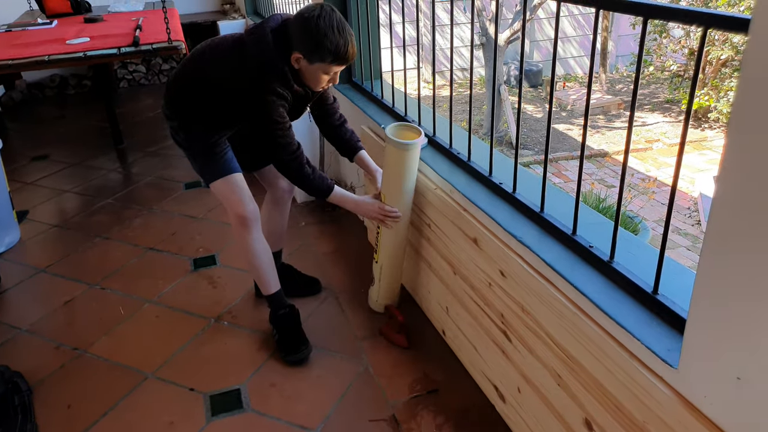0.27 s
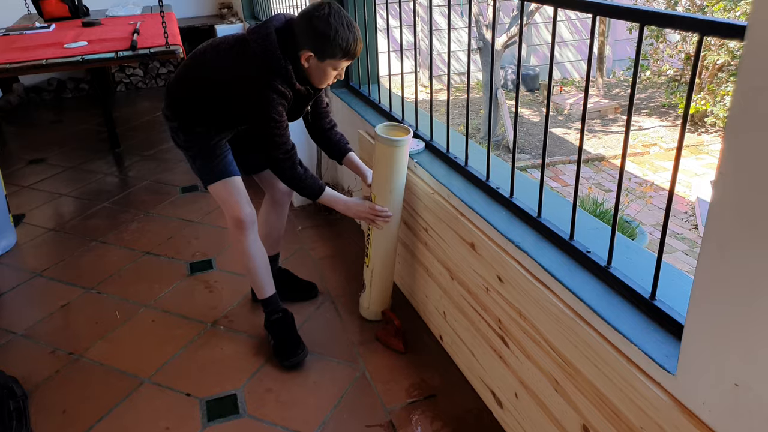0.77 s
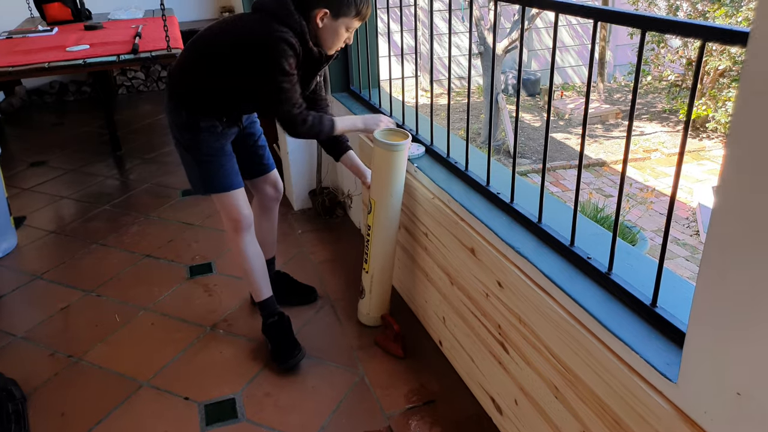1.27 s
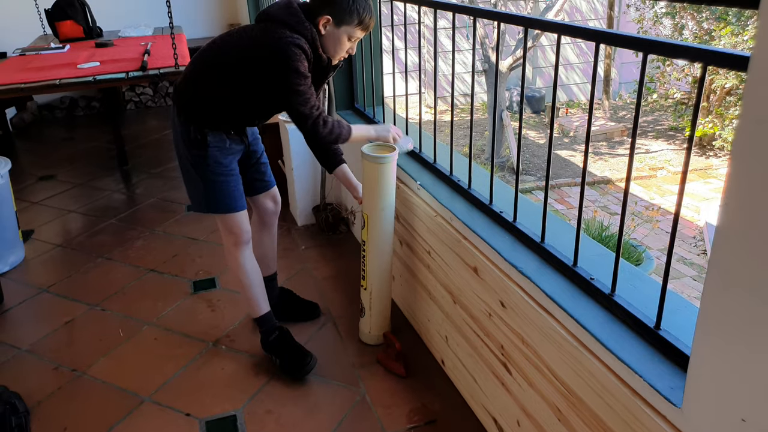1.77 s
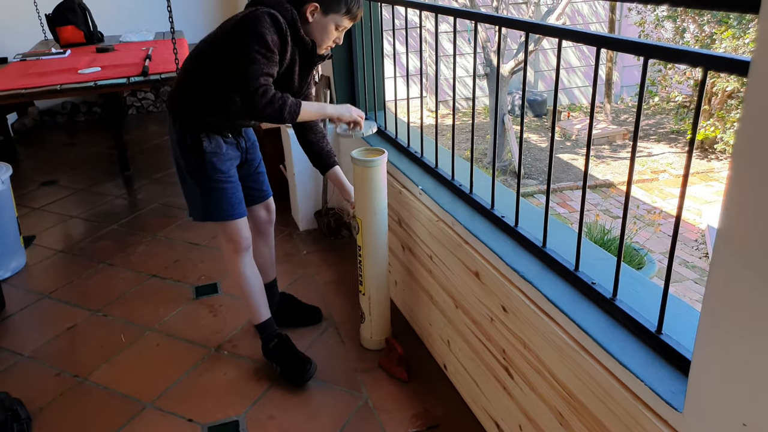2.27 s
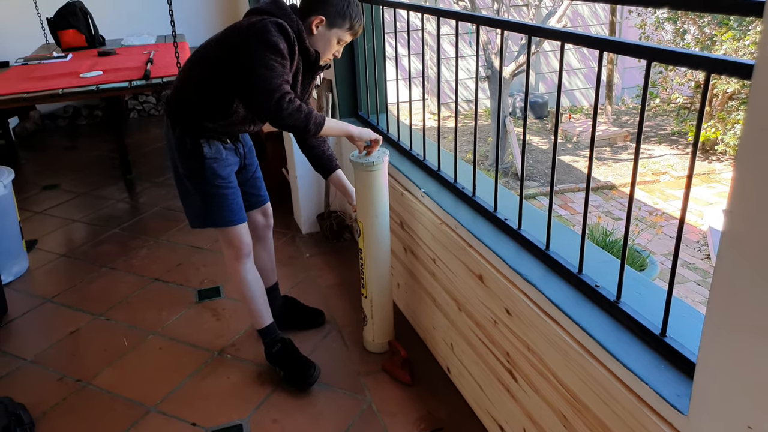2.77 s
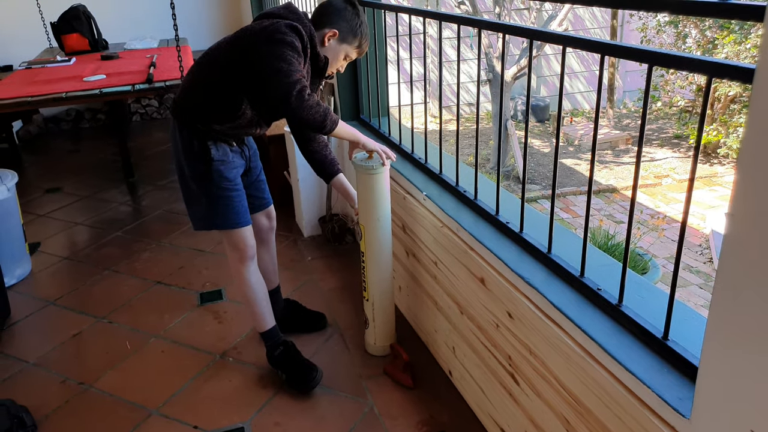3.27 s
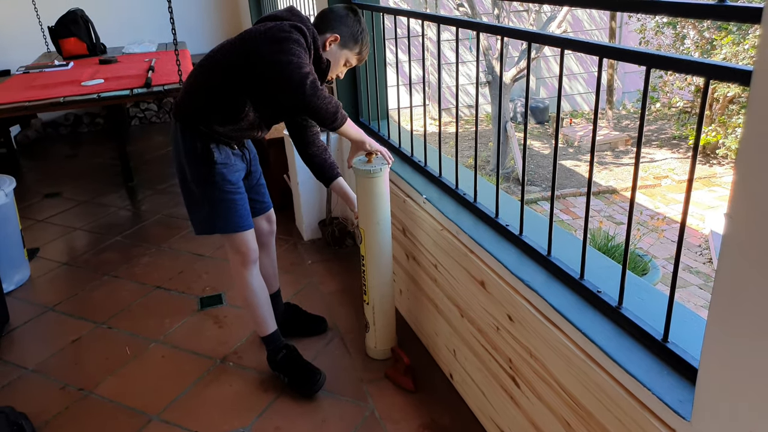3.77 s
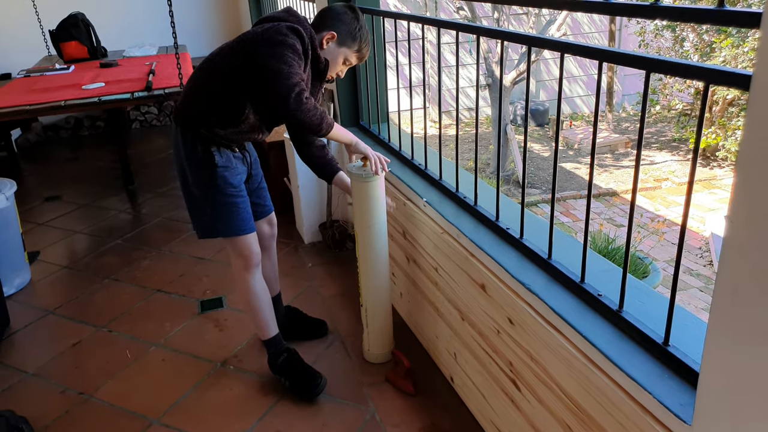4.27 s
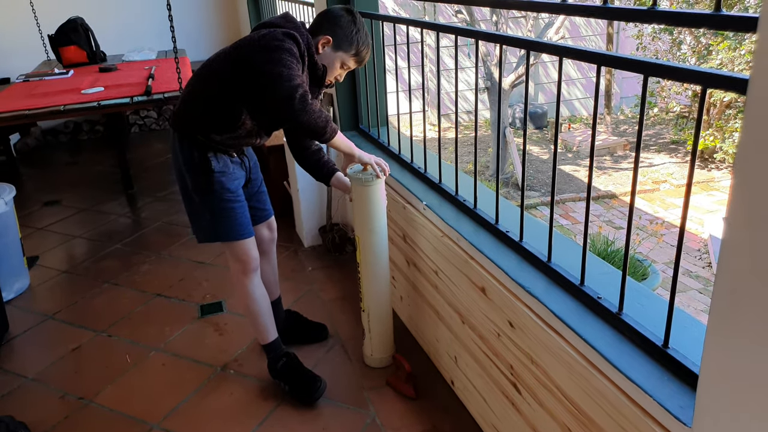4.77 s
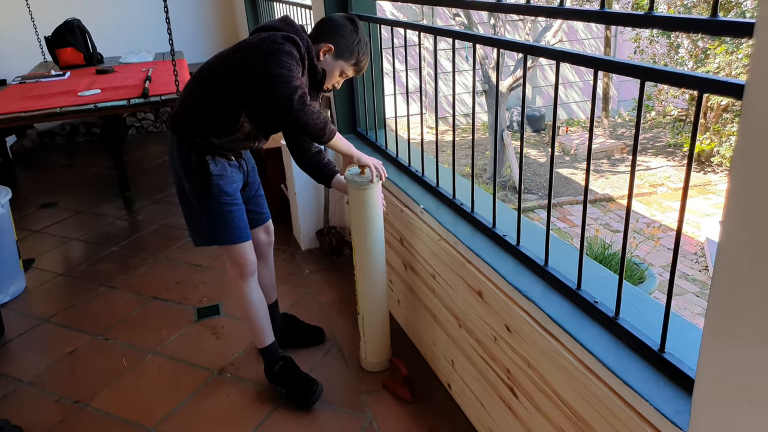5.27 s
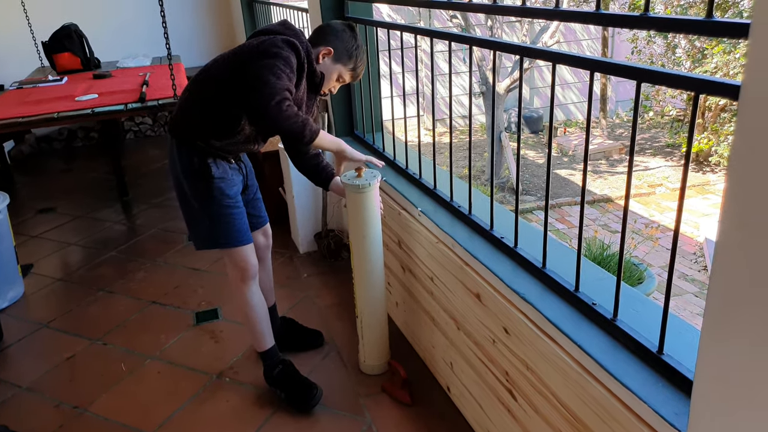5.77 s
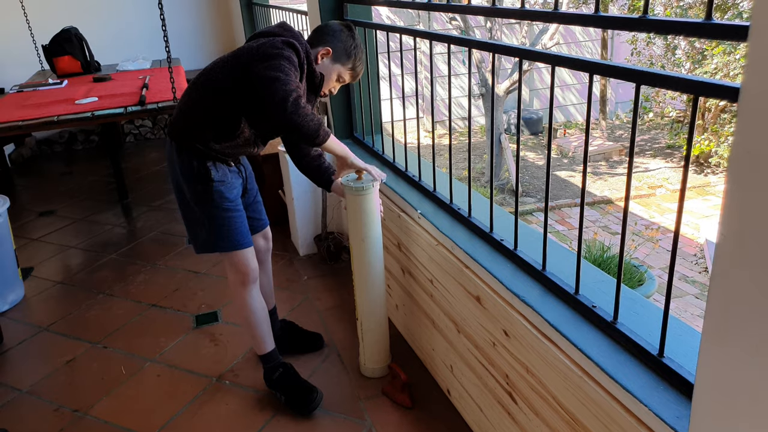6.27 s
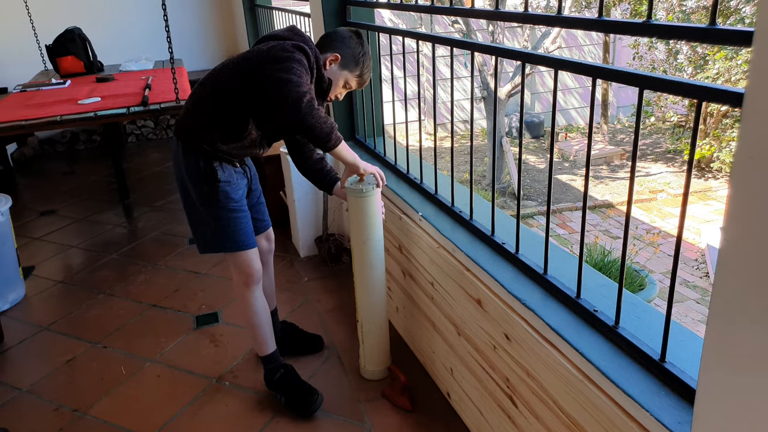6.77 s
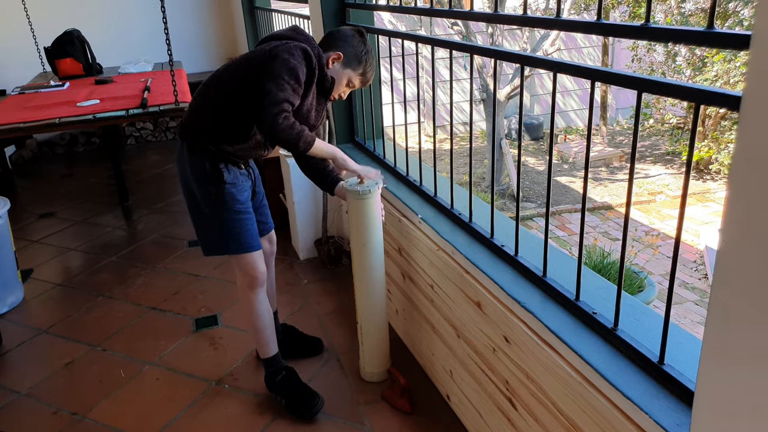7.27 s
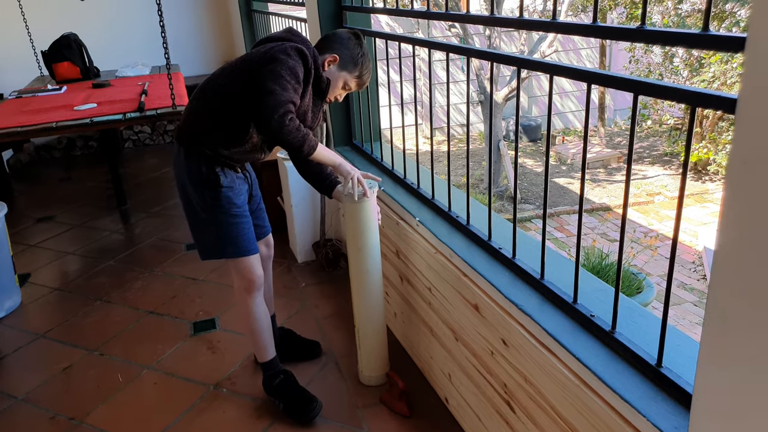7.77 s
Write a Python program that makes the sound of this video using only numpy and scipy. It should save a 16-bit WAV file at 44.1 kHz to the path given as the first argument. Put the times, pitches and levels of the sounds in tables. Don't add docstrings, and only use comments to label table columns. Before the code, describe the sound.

A wide plastic pipe strikes floor tiles three times in quick succession, loud, hollow and resonant. Then much quieter handling follows: a cap rubs and turns on the rim with grainy scrapes, dry ticks, dull presses and scattered light knocks, growing busier after the middle. Small birds chirp faintly outdoors over a soft hush. Close stereo microphones on an open veranda with a short reverberation.

```python
import sys
import numpy as np
from scipy import signal
from scipy.fft import rfft, irfft, next_fast_len
from scipy.io import wavfile
from scipy.ndimage import uniform_filter1d

SR = 44100
rng = np.random.default_rng(int(sys.argv[2]) if len(sys.argv) > 2 else 0)


def store_pcm(level_fs):
    pcm = np.round(np.clip(level_fs, -1, 1) * 32767).astype(np.int16)
    wavfile.write(sys.argv[1], SR, np.atleast_2d(pcm).T)


def undo_db(level):
    steps = np.asarray(level, float) / 20
    return 10 ** steps


N = 353329

# (time [s], peak [dB], brightness [dB/octave], wall ring [Hz], wall ring [dB])
KNOCKS = [
    (-.085, -14.5, -1.5, 1170, -15),
    (0.2384, -3, 2.5, 1070, -16),
    (.461, -4.5, 1, 980, -15),
    (0.664, -4, 1.5, 1295, -8.5),
]
# (frequency [Hz], level [dB], t60 [s], sign [+1 or -1])
AIR_MODES = [(152, -7, .8, -1), (163.5, -7, .2, -1), (280, 3, .17, 1), (301.5, 3, .17, -1),
             (109, -9, .2, 1), (450, -17, .09, -1), (515, -3, .05, 1), (556, 0.1, .07, 1),
             (595, -4, .06, 1), (660, -10, .06, 1), (720, -10, .07, 1)]
# (frequency [Hz], level [dB], t60 [s])
WALL_MODES = [(987, -9.5, .05), (1132, -8.5, 0.032), (1340, -15.5, 0.03), (1616, -13.5, 0.035),
              (1756, -16, .03), (2053, -11.5, 0.063), (2200, -19.5, 0.045), (3240, -19, .02),
              (3400, -13, 0.008), (4050, -22.5, 0.015)]
# (frequency [Hz], gain [dB])
RIM_CRACK = [(300, -14), (1200, 17.5), (4000, -12.0), (7000, -34.0), (16000, -46.0)]
# (frequency [Hz], gain [dB])
RIM_CLICK = [(400, -10.5), (1500, -5), (3400, 1.3), (6000, -11.5), (16000, -35.5)]

# (frequency [Hz], t60 [s], level [dB])
VERANDA = [(59.3, 0.4, -11.5), (125, 0.34, -23.5), (252, 0.28, -13.5), (1000, 0.23, -8.5),
           (3000, 0.31, -9.5), (7600, 0.18, -7), (15700, 0.067, -29)]
# (frequency [Hz], density [dB per Hz])
HUSH = [(25, -1), (75, 2), (130, -7), (300, -3), (600, -6), (1100, -8), (1600, -11.5), (2500, -22.5),
        (3500, -11.5), (6000, -9.5), (7300, -12), (8200, -33), (12500, -28), (16000, -44)]

# (start [s], length [s], level [dB], grit above the hollow rub [dB])
TURNS = [(0.0, 0.021, -56, 1), (0.09, 0.53, -56.5, -3), (0.703, 0.44, -65.5, -1.5), (1.409, 0.18, -70, 2.5),
         (1.762, 0.021, -56, 3), (1.948, 0.38, -61, 1.3), (2.412, 0.035, -57.5, -4.5),
         (2.578, 0.23, -64, 2.5), (2.9, 0.077, -67, -3), (3.104, 0.12, -71.5, 6), (3.264, .02, -62, -3),
         (3.395, .1, -62.5, -5), (3.286, 0.0092, -50, -12), (3.554, 0.12, -49.5, -8),
         (3.844, 0.17, -51, -1.5), (4.085, 0.069, -50.5, -0.5), (4.337, 0.092, -62, -9.5),
         (4.508, 0.082, -55.5, -2), (4.712, 0.026, -52, -2), (4.79, 0.044, -54.5, 1),
         (4.866, 0.052, -52, 4.2), (5.058, 0.12, -54.5, -1), (5.281, 0.026, -49.5, -6.5),
         (5.364, 0.056, -49, -5.5), (5.517, 0.11, -56.5, -3.5), (5.81, 0.23, -68.5, 2.5),
         (5.972, 0.11, -52.5, -5.5), (6.163, 0.07, -61, 3), (6.307, 0.18, -69.5, -21),
         (6.565, 0.034, -52.5, -0.5), (6.68, 0.046, -56, -2), (6.775, 0.087, -51, -1.5),
         (6.94, 0.17, -53, -3), (7.183, 0.093, -58.5, -2), (7.519, 0.23, -48.5, -3.5),
         (7.875, 0.011, -51, -5), (8.023, 0.023, -62.5, 11.5)]
# (start [s], length [s], level [dB])
WIPES = [(1.068, 0.037, -79.5), (1.76, 0.055, -72), (2.047, 0.04, -72), (2.113, 0.051, -70.5),
         (2.412, 0.027, -79), (2.834, 0.043, -82), (3.546, 0.11, -82), (3.853, 0.22, -74),
         (4.054, 0.094, -65.5), (4.524, 0.2, -76), (4.823, 0.067, -67.5), (5.065, .09, -75),
         (5.44, 0.17, -86), (6.023, 0.052, -73), (6.584, 0.035, -85), (6.773, 0.24, -75),
         (7.564, 0.11, -73), (7.722, 0.081, -70), (7.88, 0.025, -69)]
# (start [s], length [s], level [dB])
ROCKS = [(4.41, 0.2, -67), (2.062, 0.16, -64), (2.43, 0.018, -61), (2.703, 0.052, -52.5),
         (3.288, 0.0087, -47), (3.583, 0.02, -47), (3.696, 0.027, -72), (3.935, 0.29, -57.5),
         (4.726, 0.16, -57), (5.126, 0.041, -40), (5.3, 0.12, -55.5), (5.53, 0.11, -60),
         (5.98, 0.079, -49.5), (6.573, 0.015, -46.5), (6.746, 0.15, -45.5), (6.946, 0.45, -57.5),
         (7.503, 0.34, -56)]
# (frequency [Hz], width [Hz], level [dB])
ROCK_PEAKS = [(93, 21, -5.5), (184, 46, 0), (277.5, 14, -2.5)]
# (frequency [Hz], width [Hz], level [dB])
HOLLOW_PEAKS = [(522, 250, 0), (618, 77, -6), (895, 180, -13.5), (1207, 360, -4), (1960, 760, -4)]
# (frequency [Hz], width [Hz], level [dB])
RASP_PEAKS = [(3200, 1000, -15), (3700, 1300, -1), (4700, 1300, -14), (6220, 1800, -10.5)]
# (frequency [Hz], width [Hz], level [dB])
HISS_PEAKS = [(9475, 2000, -4.5), (10980, 1800, -0.5), (12900, 2700, -1), (14800, 1400, -12.5)]

# (time [s], peak [dB], level under 7 kHz [dB], length [s])
TICKS = [(0.2438, -43, 29, 0.00062), (0.467, -70, -18, 0.0026), (0.685, -57, 22.5, 0.0082),
         (1.068, -58.5, 1.5, 0.0035), (2.032, -35.5, -1, 0.0055), (2.094, -48, -11, 0.003),
         (2.154, -46, -4, 0.0017), (2.207, -50, -2, 0.0025), (3.5535, -44, 26, 0.00038),
         (3.82, -65, 10, 0.003), (4.821, -39.5, 5.5, 0.0015), (4.879, -47.5, 14.5, 0.0058),
         (4.998, -47, 4, 0.0024), (5.737, -77.5, 19, 0.0017), (6.055, -42, 4.5, 0.0049),
         (6.852, -56, 10, 0.0033), (7.228, -59, -9, 0.004), (7.75, -40, 0, 0.0069),
         (7.875, -44.5, -21, 0.0052), (7.914, -46, -21, 0.0029)]
# (time [s], peak [dB], hardness [dB], strongest ring [Hz])
PRESSES = [(0.861, -43, 0, 490), (2.735, -33.5, 0.5, 473), (3.102, -48.5, -8, 473), (3.282, -29, 1, 820),
           (3.293, -33, 1, 560), (5.059, -52, 11, 600), (5.093, -31.5, -10, 495), (4.885, -41, -27, 505),
           (5.264, -30.5, -13.5, 477), (5.943, -45, 6, 500), (6.0, -32, -3.5, 734), (6.488, -47.5, -7, 470),
           (6.778, -29.5, 3.5, 1950), (6.784, -31.5, -10, 666), (7.215, -40, -18, 617),
           (7.994, -43.5, 0.5, 575)]
# (time [s], peak [dB], hardness [dB], strongest ring [Hz])
TAPS = [(2.432, -48.5, 10, 530), (2.716, -41, -7, 530), (2.755, -28.5, -5.5, 290), (3.275, -37, 9.5, 1240),
        (3.544, -42.5, 15, 735), (3.667, -46, -9, 600), (3.6725, -20.5, 0.5, 1000),
        (3.677, -21.5, -15, 495), (3.898, -42.5, -18, 530), (3.969, -44, -9, 462), (4.148, -40, 0, 633),
        (4.275, -45, 5, 546), (4.403, -48, -18, 476), (4.489, -46, 2, 975), (4.503, -46.5, 9, 537),
        (4.782, -45, 5, 638), (4.595, -48, 7.5, 570), (4.869, -34.5, 0, 985), (4.889, -46.5, 8, 1500),
        (5.113, -23, 0, 753), (5.132, -21, -0.5, 487), (5.52, -44, -8, 487), (5.607, -42, -26, 506),
        (6.557, -26.5, 6, 1057), (6.563, -28, 8, 1290), (6.671, -30.5, 3, 1250), (6.677, -33.5, 4.5, 790),
        (6.838, -45.5, 14.5, 2070), (6.877, -26.5, -19, 480), (7.511, -44, -5, 716)]
# (time [s], peak [dB], hardness [dB], strongest ring [Hz])
SNAPS = [(1.529, -61.5, 14, 653), (2.028, -55.5, 26.5, 2200), (2.208, -61, 20.5, 514),
         (2.659, -51, 13, 2010), (3.16, -51.5, -3.5, 590), (3.549, -43.5, 24, 2100),
         (3.5535, -25, 8.5, 2020), (4.695, -45.5, 1, 511), (4.998, -48.5, 4, 545), (6.055, -52, -17, 466),
         (7.747, -36.5, -8, 550)]
# (frequency [Hz], level [dB], t60 [s])
BOOM_MODES = [(88, -11, .14), (115, -5, .14), (150, -3, .09), (182, 0, .11), (272, -3, .08)]
# (frequency [Hz], level [dB], t60 [s])
BODY_MODES = [(510.6, -11, 0.09), (600, -14, 0.075), (793, -3, 0.024), (953, -4.5, 0.035),
              (1038, -14, 0.06)]
# (frequency [Hz], level [dB], t60 [s])
UPPER_MODES = [(1310, 0, .012), (1530, -1, .01), (1760, -1, .01), (2050, -2, .01), (2400, -4, .007)]
# (frequency [Hz], level [dB], t60 [s])
SNAP_MODES = [(3250, 2, .005), (3673, 8, .004), (4200, 5, .004), (4800, -6, .003), (6000, -20, .003)]
# (frequency [Hz], gain [dB])
CAP_CRACK = [(400, -48), (1500, 30.0), (2700, -9), (3800, -8), (6500, -29), (16000, -55.5)]

# (time [s], length [s], start pitch [Hz], end pitch [Hz], level [dB])
CHIRPS = [(1.35, 0.092, 4150, 4190, -63.5), (1.39, 0.082, 3370, 2730, -71.5), (1.9, 0.046, 4530, 4120, -63),
          (1.93, 0.042, 3700, 3200, -64), (2.57, 0.057, 4270, 4290, -72.5), (2.6, 0.062, 3580, 3000, -71),
          (2.96, 0.069, 3700, 3280, -68.5), (3.095, 0.016, 3340, 2780, -62.5),
          (3.16, 0.024, 3640, 3530, -55.5), (6.73, 0.063, 4130, 3780, -56), (4.3, 0.035, 3530, 3200, -59),
          (4.61, 0.028, 5320, 4870, -59), (4.63, 0.04, 4220, 4020, -59), (5.31, 0.072, 5970, 5120, -54.5),
          (5.83, 0.078, 4300, 3540, -64), (6.14, 0.061, 3950, 4040, -65), (6.19, 0.045, 3580, 2940, -61),
          (7.07, 0.081, 4500, 3984, -55), (7.1, 0.065, 3680, 2950, -57), (7.3, 0.051, 5020, 4700, -65.5),
          (7.33, 0.11, 4260, 3570, -60), (7.83, 0.073, 4240, 3980, -55)]
# (time [s], length [s], start pitch [Hz], end pitch [Hz], level [dB])
SQUEAKS = [(6.31, 0.09, 1400, 1880, -65.5), (3.8, 0.068, 1080, 1700, -61), (5.705, 0.034, 840, 570, -57.5),
           (9.9, 0.032, 600, 590, -48.5), (5.84, 0.043, 944, 1600, -68)]

# (frequency [Hz], side - mid [dB])
WIDTH = [(30, -1.5), (70, -17.5), (350, -14.5), (700, -7), (1400, 0), (3000, -2), (10000, -0.5)]
# (frequency [Hz], left - right [dB])
LEAN = [(100, 0), (2000, 0.5), (5000, -1), (9000, 0), (13000, 7.5)]

GRIP_S, GRIP_DB = .2, -14
HUSH_DB = -71.5
RISE_DB_PER_S, FALL_DB_PER_S, ROCK_FALL_DB_PER_S = 201, 174.5, 119
REST_ROCK_DB, REST_RUB_DB, REST_GRIT_DB, REST_SKIN_DB = -78.5, -73, -77, -87.5
TICK_RING_S = 0.012
PRESS_DB, TAP_DB, SNAP_DB = (-5, -16), (-30, -10), (-35, 3.5)
PRESS_S, TAP_S, SNAP_S, CRACK_DB = .006, .0045, .0016, -13
SNAP_PER_HARDNESS = 0.85
BLOW = .35
TOP_HZ = 15750


def on_log(table, hz, axis=1):
    table = np.array(table)
    return np.interp(np.log(np.maximum(hz, 1)), np.log(table[:, 0]), table[:, axis])


def colour(x, table):
    size = next_fast_len(x.shape[-1])
    hz = np.arange(size // 2 + 1) * SR / size
    return irfft(rfft(x, size) * undo_db(on_log(table, hz)), size)[..., :x.shape[-1]]


def resonate(x, peaks):
    size = next_fast_len(len(x))
    f = np.arange(1, size // 2 + 2) * SR / size
    power = 0
    for hz, width, db in peaks:
        detuning = (f * f - hz * hz) / (f * width)
        power = power + undo_db(2 * db) / (1 + detuning ** 2) ** 2
    y = irfft(rfft(x, size) * np.sqrt(power), size)[:len(x)]
    return y / y.std()


def ring(hz, gain, t60, length):
    t = np.arange(int(length * SR))[:, None] / SR
    return (gain * np.sin(2 * np.pi * hz * t) * 1000. ** (-t / t60)).sum(axis=1)


def add(track, s, sound, db):
    i = int(round(s * SR))
    sound = sound * undo_db(db) / np.abs(sound).max()
    part = sound[max(-i, 0):N - i]
    track[max(i, 0):max(i, 0) + len(part)] += part


def burst(noise, length):
    t = np.arange(len(noise)) / SR
    length = np.clip(length, .0003, .03)
    return noise * (1 - np.exp(-t / (0.11 * length))) * np.exp(-t / length)


def soften(x, hz):
    return signal.sosfilt(signal.butter(3, hz, fs=SR, output="sos"), x)


def waver(count, rate):
    k = int(SR / rate)
    steps = np.repeat(rng.standard_normal((count, N // k + 1)), k, axis=1)
    return 1.21 * uniform_filter1d(steps, size=k)[:, :N]


def whistles(notes, size):
    out = np.zeros(N)
    for s, length, start_hz, end_hz, db in notes:
        u = np.linspace(0, 1, int(length * SR))
        husk = uniform_filter1d(rng.standard_normal((2, 8000)), size=size)[:, :len(u)] * np.sqrt(size)
        phase = 2 * np.pi * np.cumsum(start_hz + (end_hz - start_hz) * u) / SR
        tone = (.3 + husk[0]) * np.sin(phase) + husk[1] * np.cos(phase)
        add(out, s, np.sin(np.pi * u) ** 0.28 * tone, db + 9.5)
    return out


def effort(starts, lengths, peaks_db, rest_db, fall=FALL_DB_PER_S):
    t = np.arange(0, N / SR + .01, .002)[:, None]
    before = np.maximum(RISE_DB_PER_S * (starts - t), 0)
    after = np.maximum(fall * (t - starts - lengths), 0)
    power = (undo_db(peaks_db - before - after) ** 2).sum(axis=1) + undo_db(rest_db) ** 2
    return np.interp(np.arange(N) / SR, t[:, 0], 10 * np.log10(power))


def knocks():
    out = np.zeros(N)
    for s, peak_db, bright_db, wall_hz, wall_db in KNOCKS:
        wall = WALL_MODES + [(wall_hz, wall_db, .05)]
        hz, db, t60, sign = np.transpose(AIR_MODES + [(*mode, 1) for mode in wall])
        scatter = rng.standard_normal(len(hz))
        noise = rng.standard_normal(1500)
        gain = sign * undo_db(db + scatter + bright_db * np.log2(hz / 500))
        body = ring(hz * (1 + .025 * (hz > 800) * scatter), gain, t60, .7)
        choke = np.clip((np.arange(len(body)) / SR - GRIP_S) / .03, 0, 1)
        body = np.pad(body * undo_db(GRIP_DB * choke), (70, 0))
        body = soften(body, 5900)
        crack = colour(burst(noise, 0.012), RIM_CRACK)
        body[:len(crack)] += undo_db(-1.5) * crack
        body[40:540] += undo_db(-3.0) * colour(burst(noise[-500:], 0.00085), RIM_CLICK)
        add(out, s, body, peak_db)
    return out


def port_paths(hits):
    scatter = np.diff(burst(rng.standard_normal(400), 0.0014))
    return signal.fftconvolve(hits, scatter)[:N] * undo_db(-15.5)


def veranda_echo():
    t = np.arange(int(.6 * SR)) / SR
    out = 0
    for hz in 60 * 2. ** np.arange(9):
        octave = [(hz / 2, -40), (hz / 1.3, -3), (hz, 0), (hz * 2.5, -3), (hz * 2, -40)]
        band = colour(rng.standard_normal((2, len(t))), octave)
        out = out + band * undo_db(on_log(VERANDA, hz, axis=2)) * 1000. ** (-t / on_log(VERANDA, hz))
    return out * (1 - np.exp(-t / 0.0011)) * undo_db(-25.0)


def outdoor_hush():
    hush = colour(rng.standard_normal((2, N)), HUSH)
    return hush * undo_db(HUSH_DB + 1.1 * waver(count=1, rate=6.0)) / hush.std()


def handling_rumble():
    level = np.interp(np.arange(N) / SR, [0, 2, 3, 8], [-79.5, -94.5, -79.5, -78.5])
    return resonate(rng.standard_normal(N), [(34.8, 30, 0)]) * undo_db(level)


def rubbing():
    start, length, rub_db, grit_db = np.transpose(TURNS)
    movements = (
        (ROCK_PEAKS, effort(*np.transpose(ROCKS), REST_ROCK_DB, ROCK_FALL_DB_PER_S), 0.0045),
        (HOLLOW_PEAKS, effort(start, length, rub_db, REST_RUB_DB), .15),
        (RASP_PEAKS, effort(start, length, rub_db + grit_db, REST_GRIT_DB), 0.0),
        (HISS_PEAKS, effort(*np.transpose(WIPES), REST_SKIN_DB), 0.0))
    slips = rng.standard_normal((2, N)) * undo_db(2.4 * np.minimum(rng.exponential(size=N), 4.5))
    drag = waver(count=1, rate=59)[0]
    out = 0
    for peaks, level, dulling in movements:
        patchy = waver(count=len(peaks), rate=16)
        gain = undo_db(level + 2.57 * drag) / np.sqrt(len(peaks))
        for (hz, width, peak_db), patch in zip(peaks, patchy):
            band = np.array([resonate(row, [(hz, width, 0)]) for row in slips])
            tilt = dulling * np.log2(hz / peaks[0][0]) * (level - level.max() + 6.5)
            out = out + band * gain * undo_db(peak_db - 3.5 + tilt + 4.3 * patch)
    return out


def ticks():
    out = np.zeros(N)
    for s, peak_db, low_db, length in TICKS:
        force = burst(rng.standard_normal(2048), length)
        fade = np.exp(-np.arange(len(force)) / SR / TICK_RING_S)
        add(out, s, resonate(force, HISS_PEAKS) * fade, peak_db)
        add(out, s, resonate(force, RASP_PEAKS + [(1550, 2100, -1.0)]) * fade, peak_db + low_db)
    return out


def cap_contacts():
    out = np.zeros(N)
    kinds = ((PRESSES, PRESS_DB, PRESS_S), (TAPS, TAP_DB, TAP_S), (SNAPS, SNAP_DB, SNAP_S))
    for contacts, (boom_db, snap_db), length in kinds:
        for s, peak_db, hard_db, ring_hz in contacts:
            force = burst(rng.standard_normal(3000), length)
            force[int(length * SR / 2)] += BLOW * np.sqrt(length * SR)
            add(out, s - .001, colour(force, CAP_CRACK), peak_db + hard_db + CRACK_DB)
            body, upper = BODY_MODES, UPPER_MODES
            if ring_hz < 1175:
                body = body + [(ring_hz, 4, .025)]
            else:
                upper = upper + [(ring_hz, 0.1, .025)]
            # (modes, relative level [dB], softness limit [Hz])
            families = ((body, 0, 1300), (BOOM_MODES, boom_db, 450), (upper, hard_db, 2700),
                        (SNAP_MODES, snap_db + SNAP_PER_HARDNESS * hard_db, 6000))
            for modes, rel_db, soft_hz in families:
                hz, db, t60 = np.transpose(modes)
                detune, reweight = rng.standard_normal((2, len(hz)))
                modal = ring(hz * (1 + 0.034 * detune), undo_db(db + 2 * reweight), t60, min(.2, 2 * t60.max()))
                add(out, s - .001, signal.fftconvolve(soften(force, soft_hz), modal), peak_db + rel_db)
    return out


def birds():
    return whistles(CHIRPS, size=85)


def squeaks():
    return whistles(SQUEAKS, size=150)


def scene():
    hits = knocks() + ticks() + cap_contacts() + squeaks()
    rub, far = rubbing(), birds()
    hush, rumble = outdoor_hush(), handling_rumble()
    near = signal.sosfilt(signal.butter(4, 72, "high", fs=SR, output="sos"), hits + rub[0])
    sent = near + far * undo_db(0.5)
    echo_mid, echo_side = signal.fftconvolve(sent[None], veranda_echo(), axes=1)[:, :N]
    mid = echo_mid + near + undo_db(-0.5) * far + hush[0] + rumble
    side = echo_side * undo_db(2.5) + hush[1] + rub[1] + port_paths(hits) + undo_db(4.5) * rumble
    side = colour(side, WIDTH)
    return np.array([mid + side, mid - side])


def top_cut(x):
    return signal.sosfilt(signal.butter(12, 15900, fs=SR, output="sos"), x)


def record(dry):
    left = colour(dry[0], [(hz, db / 2) for hz, db in LEAN])
    right = colour(dry[1], [(hz, -db / 2) for hz, db in LEAN])
    rounded = np.tanh(0.68 * np.array([left, right])) / 0.55
    top = signal.ellip(8, .2, 60, TOP_HZ, fs=SR, output="sos")
    return top_cut(signal.sosfilt(top, rounded))


dry = scene()
out = record(dry)
store_pcm(out)
```